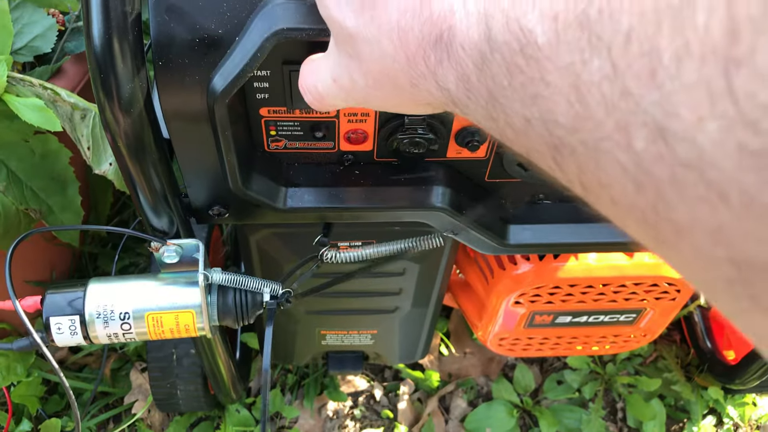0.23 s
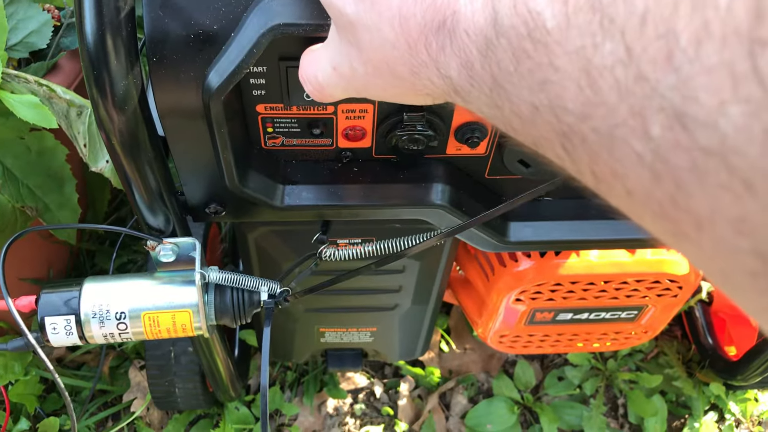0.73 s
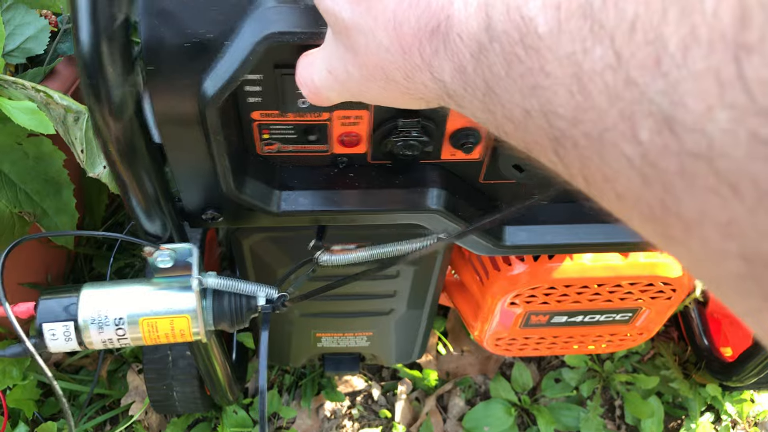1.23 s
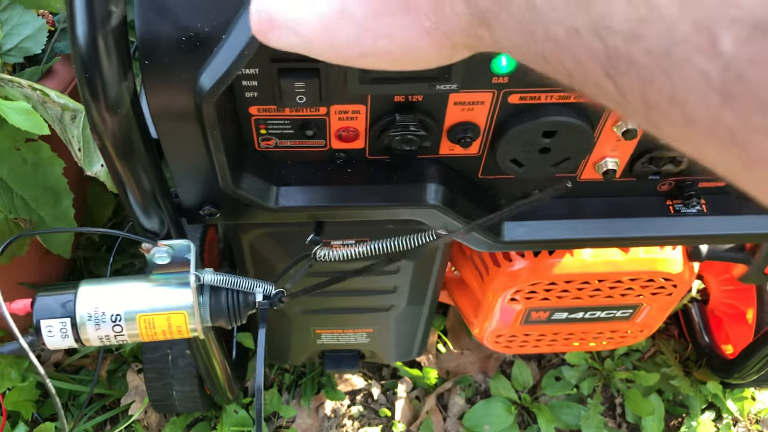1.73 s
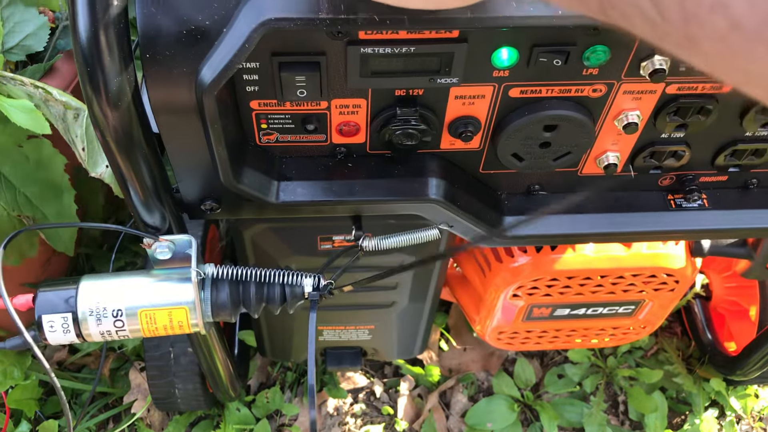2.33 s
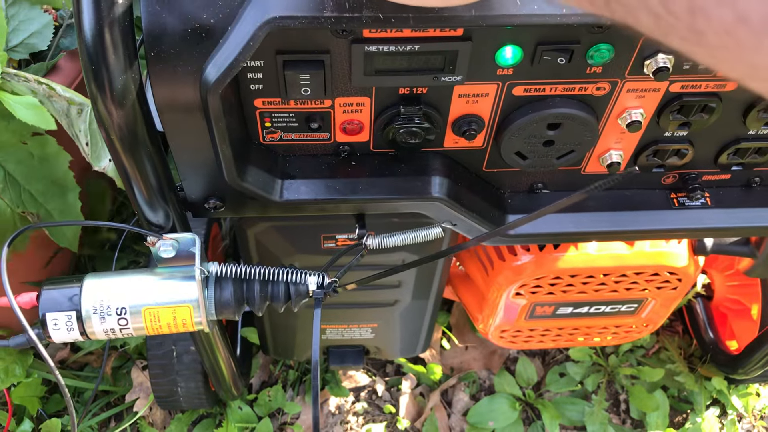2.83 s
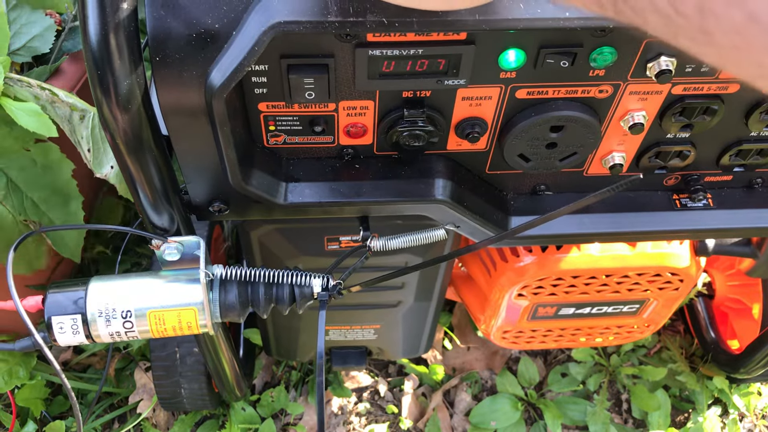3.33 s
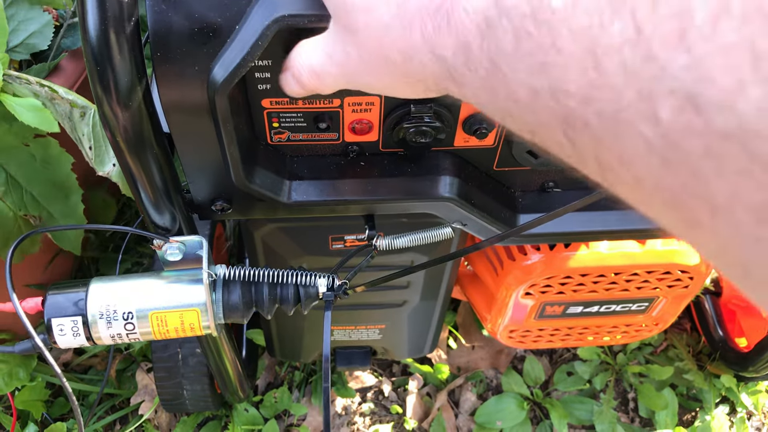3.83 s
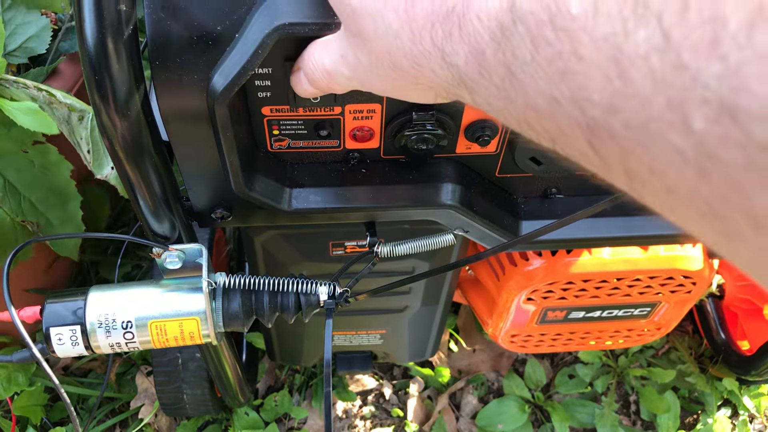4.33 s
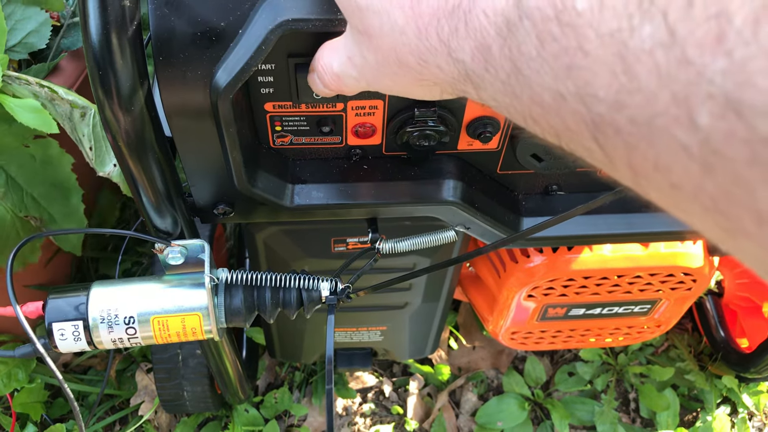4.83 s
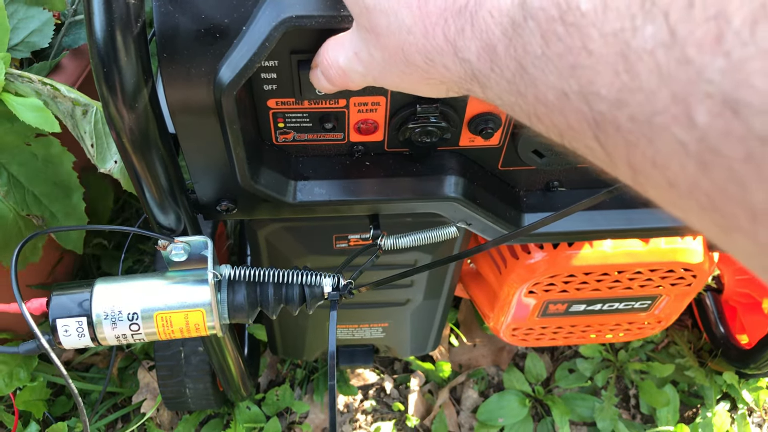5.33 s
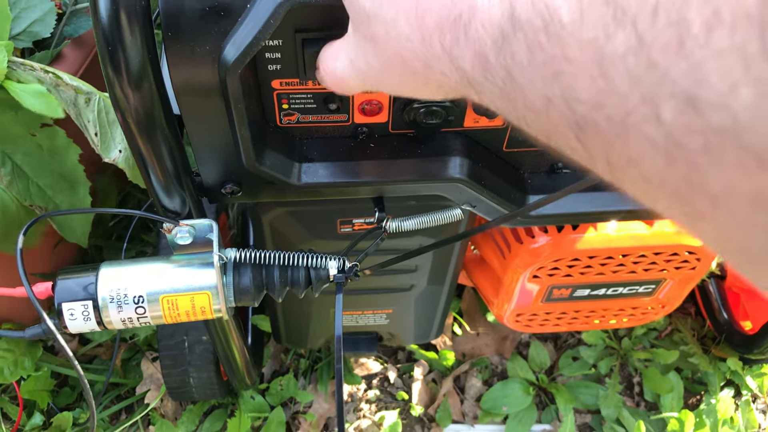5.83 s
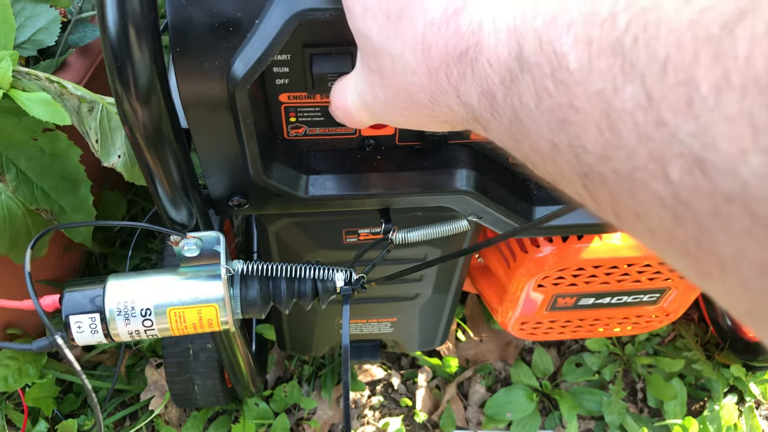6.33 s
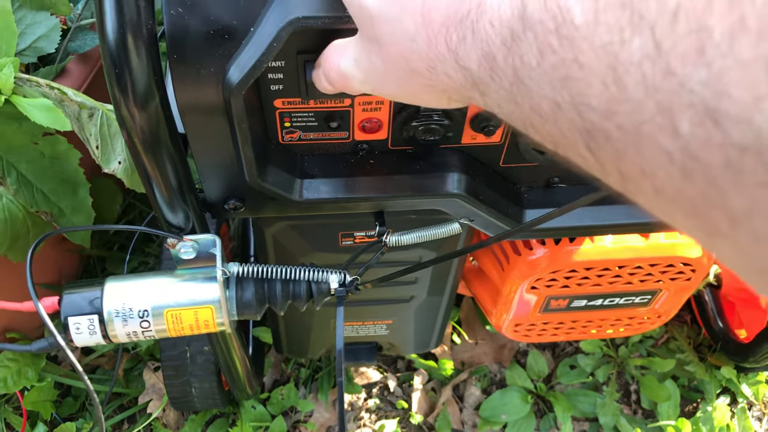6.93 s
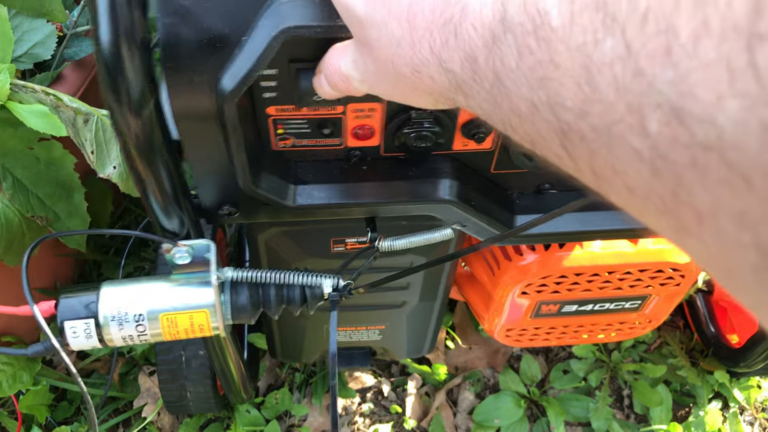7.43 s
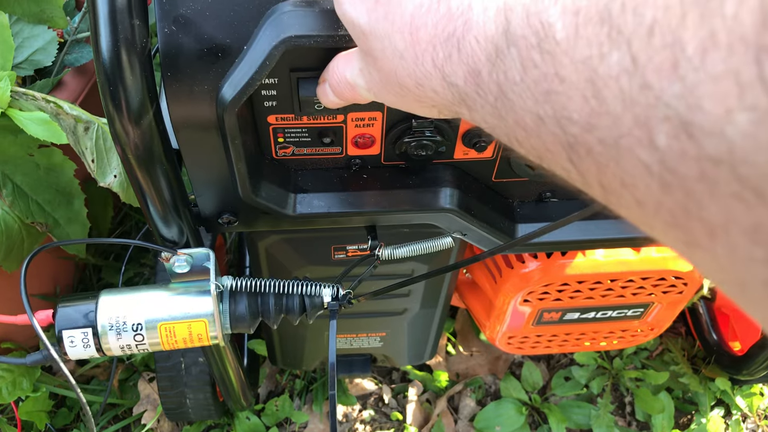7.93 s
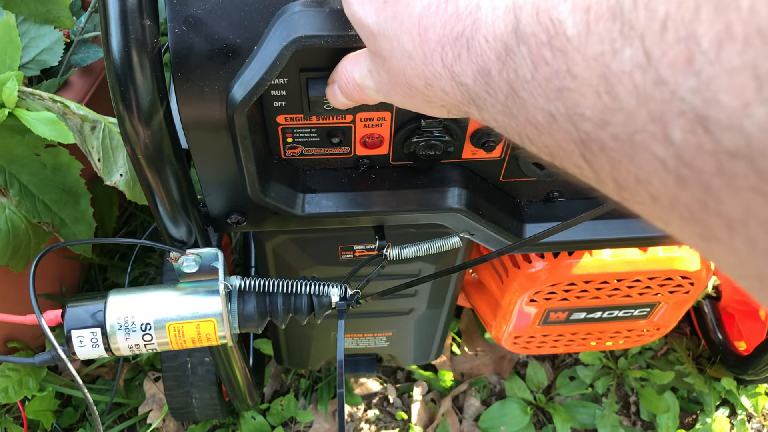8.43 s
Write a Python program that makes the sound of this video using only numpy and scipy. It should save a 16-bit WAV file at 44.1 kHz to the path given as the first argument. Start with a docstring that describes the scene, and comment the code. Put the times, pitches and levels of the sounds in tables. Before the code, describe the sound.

Close metallic clacks and labouring starter whine, a loud popping engine run-up, sudden plunge to a very quiet dull hum, then spin-down into faint outdoor air.

```python
"""A single-cylinder four-stroke generator is started electrically, outdoors, close by.
The starter clacks in and whines by gear meshing; the engine catches with sharp pops, and pressure
pulses timed by the crank angle ring its frame. Just before 2 s the sound drops steeply to a faint,
dull hum of cycle-rate harmonics. With the ignition off, friction and drag slow the crank to rest
under intake drone, hiss and ticks; outdoor air noise lies beneath."""
import sys
import numpy as np
from scipy import signal
from scipy.fft import rfft, irfft
from scipy.io import wavfile

SR = 44100
rng = np.random.default_rng(int(sys.argv[2]) if len(sys.argv) > 2 else 0)


def unload_wav(signal):
    """Save mono or channel-first audio to the path in sys.argv[1] as 16-bit WAV at rate SR, clipped to [-1, 1]."""
    wavfile.write(
        sys.argv[1],
        SR,
        np.round(np.clip(np.atleast_2d(signal).T, -1, 1) * 32767).astype(np.int16),
    )


N = 382788
TIME = np.arange(N) / SR  # s


def gain_of(db):
    """Level definition: decibels to amplitude ratio."""
    return 10 ** (np.asarray(db) / 20)


def evened(x):
    """Power normalization: scales to rms 1."""
    return x / np.sqrt(np.mean(x ** 2) + 1e-20)


def curves(rows):
    """Linear interpolation: each column of a table, joined by straight lines in time."""
    s, *columns = np.transpose(rows)
    return [np.interp(TIME, s, column) for column in columns]


def rise(start_s, length_s):
    """Linear onset: a straight ramp from 0 to 1."""
    return np.clip((TIME - start_s) / length_s, 0, 1)


def fall(start_s, decay_s):
    """Exponential decay: holds at 1, then dies away."""
    return np.exp(-np.maximum(TIME - start_s, 0) / decay_s)


def louder_with(speed, db, db_per_octave):
    """Power law of speed: db at top speed, sinking with every halving of the speed."""
    return gain_of(db + db_per_octave * np.log2(speed / speed.max() + 1e-9))


def wander(hz):
    """Low-pass random process: slow chance of rms 1 with a Gaussian roll-off at hz."""
    spectrum = rfft(rng.standard_normal(N))
    return evened(irfft(spectrum * np.exp(-(np.fft.rfftfreq(N, 1 / SR) / hz) ** 2), N))


def response(tone, modes=(), tilt_db=0, size=8192):
    """Minimum phase: the causal impulse response of a smooth spectrum with resonances on top."""
    hz = np.fft.rfftfreq(size, 1 / SR) + 1
    f, db = np.transpose(tone)
    db = np.interp(np.log(hz), np.log(f), db) + tilt_db * np.log2(hz / f[0])
    for centre, width, lift_db in modes:
        db = db + lift_db / (1 + (2 * (hz - centre) / width) ** 2)
    # folding the cepstrum onto positive time makes the response causal
    cepstrum = irfft(np.log(gain_of(db)))
    cepstrum[1:size // 2] *= 2
    cepstrum[size // 2 + 1:] = 0
    return irfft(np.exp(rfft(cepstrum)))[:size // 2]


def noise(swing_db, tone, modes=()):
    """Modulated broadband excitation: noise swells by swing_db and rings in a body."""
    source = rng.standard_normal(N) * gain_of(swing_db)
    return evened(signal.oaconvolve(source, response(tone, modes))[:N])


def blows(rows, tone, modes, rise_s, push):
    """Impact excitation: one push and a dying spray of tiny impacts ring in a body."""
    out, t = np.zeros(N), np.arange(SR // 5) / SR
    for s, peak_db, tilt_db, decay_s in rows:
        envelope = (1 - np.exp(-t / rise_s)) * np.exp(-t / decay_s)
        spray = rng.standard_normal(len(t)) * envelope
        spray[0] += push * np.linalg.norm(spray)
        ring = signal.fftconvolve(spray, response(tone, modes, tilt_db))
        part = out[round(s * SR):][:len(ring)]
        part += (gain_of(peak_db) * ring / abs(ring).max())[:len(part)]
    return out


def drone(turn, orders, scatter):
    """Fourier synthesis: harmonics of the cycle rate form a pulse, the high ones scattered in phase."""
    total = 0
    for k, db in orders:
        phase = min(k * scatter, np.pi) * rng.standard_normal()
        total = total + gain_of(db) * np.cos(2 * np.pi * round(k) * turn + phase)
    return evened(total)


PINION_TEETH = 9


def whine(hz, jitter, bite_db, overtone=0, runout=0):
    """Gear-mesh modulation: uneven teeth jolt pitch and strength; runout sways phase each shaft turn."""
    uneven = wander(400) + 0.22 * wander(50)
    angle = 2 * np.pi * np.cumsum(hz * (1 + jitter * uneven)) / SR
    angle = angle + runout * np.sin(angle / PINION_TEETH)
    wave = np.sin(angle) + overtone * np.sin(2 * angle) + 0.28 * overtone ** 2 * np.sin(3 * angle)
    return np.sqrt(2) * evened(gain_of(bite_db * wander(97))) * wave


# outdoor air around the start, and in the quiet: spectra [f/Hz, level/dB]
AIR = [(18, -33), (30, -4), (113, -0.5), (328, -10), (364, -15), (698, -9), (2310, -20), (4900, -46),
       (15000, -54.5)]
QUIET = [(18, -33.5), (30, -4.5), (81, 6.5), (205, -2), (247, -1.5), (274, -2), (538, -8), (680, -7),
         (1140, -10), (4310, -20), (15000, -26.5)]
AIR_DB, QUIET_DB = -42.5, -67.5


def start_air():
    """Stationary broadband noise: the stronger outdoor air, before the drop."""
    return gain_of(AIR_DB) * noise(0, AIR)


def quiet_air():
    """Slowly modulated broadband noise: the faint outdoor air."""
    return gain_of(QUIET_DB) * noise(.7 * wander(12), QUIET)


# soft low bumps [t/s, peak level/dB, brightness/(dB per octave), decay/s]
BUMPS = [(1.118, -15, 1, 0.011), (1.255, -13, -2, 0.024), (7.48, -60, -3, .027), (7.615, -61, -5, .015),
         (8.235, -58.5, -4.5, .03), (8.49, -58.5, -8.5, .03), (8.575, -58.5, -3.5, 0.047)]
# low rumble spectrum [f/Hz, level/dB]
RUMBLE_TONE = [(27, -38.5), (46, 0), (80, 9.5), (150, -3), (300, -7.5), (500, -22), (1500, -59)]


def soft_bumps():
    """Soft impact: a slow onset without a push keeps each bump dull."""
    return blows(BUMPS, RUMBLE_TONE, (), rise_s=0.0074, push=0)


# clacks of solenoid, pinion and crank [t/s, peak level/dB, brightness/(dB per octave), decay/s]
CLACKS = [(.123, -29, 4.5, 0.0028), (.1335, -13, 3, 0.0025), (.156, -3, 0.5, 0.0039), (.161, -5, 1, 0.031),
          (.177, -16, -1.5, 0.0053), (.2135, -1, 3, 0.0052), (.261, -15, 2.5, 0.01),
          (.5315, -8.5, 0.5, 0.0064), (.746, -14, 2.5, 0.0058), (1.077, -9.5, 1, 0.0046),
          (1.084, -2.5, -1.5, 0.007), (1.098, -16, 0.5, 0.028)]
# clack spectrum [f/Hz, level/dB]
CLACK_TONE = [(100, -35), (350, -7), (520, -13), (750, 1), (1050, -1.5), (1300, -5.5), (1650, -15),
              (2700, -16.5), (3600, -26.5), (6000, -37), (15000, -51)]
# resonances of frame, tank and covers, and of the struck chassis [f/Hz, width/Hz, lift/dB]
FRAME = [(126, 88, 2), (232, 10, 6), (366.5, 51, 3), (758, 190, 10.5), (941, 35, 5.5), (1137, 28, 8.5),
         (1293, 270, 8), (1990, 100, 7), (2150, 110, 7), (2576, 370, 8.5), (2845, 72, 7), (3760, 53, 10),
         (6290, 760, 8.5)]
CHASSIS = [(247, 8.8, 7.5), (378, 12, 8.1), (431.1, 16, 7.4)]


def metal_clacks():
    """Modal ringing: struck metal excites the resonances of frame and chassis."""
    return blows(CLACKS, CLACK_TONE, FRAME + CHASSIS, rise_s=0.0019, push=0.44)


# released pinion, freewheeling or skimming the ring gear
# [start t/s, length/s, first f/Hz, last f/Hz, level/dB, pitch jitter 0-1]
WHISTLES = [(1.0, .29, 3430, 3606, -46, 0), (1.349, .035, 2936, 3080, -25.5, .06),
            (1.48, .19, 2350, 2650, -27.5, 0.023)]
WHISTLE_SKEW, WHISTLE_ROUNDNESS = 0.51, .6  # exponents of the swell


def pinion_whistles():
    """Frequency glide: each pinion whistle climbs, swelling quickly and fading slowly."""
    out = np.zeros(N)
    for start_s, length_s, first_hz, last_hz, db, jitter in WHISTLES:
        along = rise(start_s, length_s)
        swell = abs(np.sin(np.pi * along ** WHISTLE_SKEW)) ** WHISTLE_ROUNDNESS
        glide_hz = first_hz + (last_hz - first_hz) * along
        out += gain_of(db) * swell * whine(glide_hz, jitter, bite_db=2.5)
    return out


# starter pinion, labouring against compression [t/s, gear mesh f/Hz]
MESH = [(0.14, 1091), (0.186, 1183), (0.198, 1087), (0.294, 1284), (0.422, 1852), (0.688, 2093),
        (0.716, 1944), (0.842, 2213), (0.96, 2063)]
# spectra of the gears and of the brushes [f/Hz, level/dB]
GEAR_TONE = [(150, -28.5), (500, -23.5), (700, -8.5), (1000, -1.5), (1400, -8), (1700, -16), (2300, -12.5),
             (3000, -14.5), (4600, -36.5), (7500, -37), (10000, -42.5), (15000, -55)]
BRUSH_TONE = [(1500, -27.5), (3500, -3.5), (4600, -2.5), (7500, -6), (10000, -8.5), (15000, -20.5)]
# resonances of the starter housing [f/Hz, width/Hz, lift/dB]
HOUSING = [(5370, 400, 5), (6220, 800, 13.5), (8440, 170, 14.5), (9043, 270, 6.5), (11400, 600, 7)]
# powered, released, then the gears spin on loosely until the engine pulls away
STARTER_ON_S, STARTER_RISE_S = .125, 0.042
STARTER_OFF_S, STARTER_FALL_S, GEARS_FREE_S = 0.922, 0.033, 1.37
# levels at top pinion speed, and their rise with speed
WHINE_DB, WHINE_DB_PER_OCTAVE = -18.5, 8
OVERTONE_DB, OVERTONE_DB_PER_OCTAVE = -0.5, -4.5  # richer in overtones when slow
GEARS_DB, GEARS_DB_PER_OCTAVE = -25, 3
BRUSH_DB, BRUSH_DB_PER_OCTAVE = -44.5, 10
LOOSE_GEARS_DB = -28  # does not depend on speed
SURGE_DB = 1.5  # uneven surging of the whine under load
RUNOUT_RAD = 0.47  # pinion out of true: side tones one shaft turn apart
TOP_JITTER = .036  # relative pitch jitter at top pinion speed


def starter(turn):
    """Source and filter: pinion whine peaks at frame resonances; the teeth rattle swells once each cycle."""
    mesh_hz = curves(MESH)[0]
    on = rise(STARTER_ON_S, STARTER_RISE_S)
    power = on * fall(STARTER_OFF_S, STARTER_FALL_S)
    spinning = on * fall(GEARS_FREE_S, STARTER_FALL_S)
    overtone = louder_with(mesh_hz, OVERTONE_DB, OVERTONE_DB_PER_OCTAVE)
    jitter = TOP_JITTER * mesh_hz / mesh_hz.max()  # rougher as the pinion speeds up
    teeth = whine(mesh_hz, jitter, 4, overtone, RUNOUT_RAD)
    strength = louder_with(mesh_hz, WHINE_DB + SURGE_DB * wander(23), WHINE_DB_PER_OCTAVE)
    tones = signal.oaconvolve(power * strength * teeth, response(GEAR_TONE, FRAME))[:N]
    cycle_swell_db = .6 * np.cos(2 * np.pi * (turn - .8))
    rattle = noise(1.6 * wander(250) + cycle_swell_db, GEAR_TONE, FRAME)
    driven_gain = louder_with(mesh_hz, GEARS_DB, GEARS_DB_PER_OCTAVE) * power
    rattle_gain = np.hypot(driven_gain, gain_of(LOOSE_GEARS_DB) * spinning)
    brushes = power * noise(2 * wander(60), BRUSH_TONE, HOUSING)
    brush_gain = louder_with(mesh_hz, BRUSH_DB, BRUSH_DB_PER_OCTAVE)
    return tones + rattle_gain * rattle + brush_gain * brushes


# engine speed from the first turn until it holds [t/s, four-stroke cycle rate f/Hz]
SPEED = [(.13, 0), (.3, 6.702), (.7, 4.054), (1.33, 8.134), (1.55, 23.881), (2.05, 26.599), (2.17, 30.859)]
# friction in cycles a second lost each second; time constant of air drag in s
IGNITION_OFF_S, FRICTION_PER_S, DRAG_S = 5.926, 11.25, 4.571


def crank_speed():
    """Constant plus viscous damping: cycles a second in run-up, steady speed, then coasting to rest."""
    friction = FRICTION_PER_S * DRAG_S
    return np.maximum((curves(SPEED)[0] + friction) * fall(IGNITION_OFF_S, DRAG_S) - friction, 0)


# hum at steady speed, and intake drone with open throttle [multiple of the cycle rate, level/dB]
HUM = [(2, -65), (3, -77.5), (4, -71.5), (5, -66.5), (6, -77), (8, -70), (10, -81.5), (12, -79.5),
       (13, -83), (14, -78), (15, -75.5), (18, -79.5), (19, -85.5), (22, -79.5), (23, -79.5), (25, -72),
       (26, -90), (27, -79.5), (29, -95), (30, -74.5), (31, -88)]
INTAKE = [(2, -8), (3, -0.5), (4, -4), (5, -14.5), (6, -6), (7, -1.5), (8, -10), (9, -12.5), (10, -5),
          (11, -11), (12, -15.5), (13, -12.5), (14, -13.5), (16, -12), (18, -14), (22, -15)]
# spectra of the hiss, of the valve ticks and of the ringing case [f/Hz, level/dB]
HISS_TONE = [(25, -23.5), (55, 7.5), (100, 2), (330, -1), (600, -2), (760, 4.5), (930, -1.5), (1050, -15.5),
             (2400, -15.5), (2800, -18.5), (4100, -13.5), (4800, -21.5), (9000, -16), (10400, -29.5),
             (15000, -24.5)]
TICK_TONE = [(1500, -31), (3000, -7), (3330, 2), (3700, -13.5), (9000, -20.5), (15000, -28)]
CASE_TONE = [(300, -33), (700, -4.5), (950, -0.5), (1150, -25.5), (4000, -45)]
# resonances of the engine shroud and of the case [f/Hz, width/Hz, lift/dB]
SHROUD = [(2460, 120, 4), (3870, 83, 5), (4120, 110, 6.2), (4400, 110, 7), (5330, 280, 6.1),
          (6350, 260, 5.8), (8300, 360, 3), (9580, 270, 7.5)]
CASE = [(765, 45, 8.3), (890, 58, 7)]
FAINT_S, FAINT_RISE_S = 1.93, 0.25
# the throttle closes once up to speed and opens as the engine dies
THROTTLE_CLOSES_S, THROTTLE_CLOSE_S, THROTTLE_OPENS_S, THROTTLE_OPEN_S = 2.16, 0.08, 5.896, 0.18
HUM_DB, HUM_FROM_S, HUM_RISE_S, HUM_FALL_S = -59.5, 1.98, 0.23, .12
BUZZ_DB = -16  # relative to the hum
# levels at top speed and their rise with speed; the throttle terms add when it is open
HISS_DB, HISS_DB_PER_OCTAVE, HISS_THROTTLE_DB = -64, 9, 1.3
THROB_DB, THROB_THROTTLE_DB = 1.56, 2.5  # swing within each cycle
INTAKE_DB, INTAKE_DB_PER_OCTAVE = -55, 7
CASE_DB, CASE_DB_PER_OCTAVE = -71, 3.5
TICK_DB, TICK_DB_PER_OCTAVE, TICKS_END_S, TICKS_FADE_S = -85.5, 1.5, 7.12, .1
ALTERNATOR_ORDER, ALTERNATOR_DB = 68.4, -82  # multiple of the cycle rate; level


def faint_engine(turn, speed):
    """Order-locked radiation: hum while firing; intake, hiss, case and ticks sink as the crank slows."""
    heard = rise(FAINT_S, FAINT_RISE_S)
    closing = fall(THROTTLE_CLOSES_S, THROTTLE_CLOSE_S) * heard ** 2
    throttle = closing + rise(THROTTLE_OPENS_S, THROTTLE_OPEN_S)
    shaft = turn + 0.0014 * wander(25)
    hum = drone(shaft - .69, HUM, scatter=0.1)
    # gears and cam repeat every cycle
    buzz_orders = [(k, 4 * rng.standard_normal()) for k in range(33, 83)]
    buzz = drone(shaft, buzz_orders, scatter=.1)
    alternator = gain_of(ALTERNATOR_DB) * whine(ALTERNATOR_ORDER * speed, .002, bite_db=3)
    firing = rise(HUM_FROM_S, HUM_RISE_S) * fall(IGNITION_OFF_S, HUM_FALL_S)
    running = firing * (gain_of(HUM_DB) * (hum + gain_of(BUZZ_DB) * buzz) + alternator)

    throb_db = (THROB_DB + THROB_THROTTLE_DB * throttle) * np.cos(2 * np.pi * (turn - .94))
    hiss = noise(throb_db + 1.0 * wander(150), HISS_TONE, SHROUD)
    hiss_gain = louder_with(speed, HISS_DB + HISS_THROTTLE_DB * throttle, HISS_DB_PER_OCTAVE)
    case = noise(throb_db, CASE_TONE, CASE)
    case_gain = louder_with(speed, CASE_DB, CASE_DB_PER_OCTAVE)
    intake = -drone(shaft, INTAKE, scatter=.13) * gain_of(1.2 * wander(30))
    intake_gain = louder_with(speed, INTAKE_DB, INTAKE_DB_PER_OCTAVE)
    # a deep swing leaves one short tick per cycle
    ticks = noise(26 * np.cos(2 * np.pi * (turn - .99)), TICK_TONE, [(3330, 160, 12)])
    tick_gain = fall(TICKS_END_S, TICKS_FADE_S) * louder_with(speed, TICK_DB, TICK_DB_PER_OCTAVE)
    return (running + heard * (hiss_gain * hiss + case_gain * case)
            + throttle * (intake_gain * intake + tick_gain * ticks))


# first firings, some cycles skipped [t/s, peak level/dB, brightness/(dB per octave), decay/s]
POPS = [(1.256, -20.5, -1, 0.057), (1.351, -9, -1.5, 0.039), (1.424, -9.5, 1, 0.016), (1.48, -7, -1, 0.014),
        (1.528, -10.5, 0.5, 0.014), (1.572, -8, -1.5, 0.01), (1.613, -12, .5, 0.014),
        (1.695, -14, 1.5, 0.018), (1.775, -5.5, -1, 0.012), (1.854, -7, -.5, 0.015),
        (1.93, -21.5, 2.5, 0.0015), (2.005, -54, 9, 0.017), (2.082, -54.5, 12, 0.015),
        (2.117, -55, 12, 0.025), (2.151, -51, 12, 0.025)]
# pop spectrum [f/Hz, level/dB]
POP_TONE = [(60, -4.5), (300, 0.5), (520, -4), (800, 0.5), (1300, -6), (1700, -7.5), (2700, -6.5),
            (3600, -14.5), (5000, -19), (9000, -22.5), (15000, -36)]


def firing_pops():
    """Impulsive combustion: each firing bursts into the resonances of the frame."""
    return blows(POPS, POP_TONE, FRAME, rise_s=0.0029, push=0.054)


# exhaust, valve overlap, intake and compression pulses [place/cycles, push]
STROKES = [(0.659, 0.93), (.89, 0.059), (0.971, -1.1), (1.25, -.25)]


def strokes(turn, tone, modes, uneven_db):
    """Periodic impulse excitation: pressure pulses of each cycle, each a little different in strength."""
    kicks = np.zeros(N)
    for place, push in STROKES:
        # one kick whenever the crank passes this place
        kicks += push * np.diff(np.floor(turn - place), prepend=np.floor(-place))
    kicks *= gain_of(uneven_db * rng.standard_normal(N))
    ring = response(tone, modes)
    return signal.oaconvolve(kicks, ring / abs(ring).max())[:N]


# spectra of the pressure pulses and of the clatter [f/Hz, level/dB]
STROKE_TONE = [(27, -33), (43, 7.5), (90, 1), (150, -1), (280, -7), (500, -25), (1000, -44.5),
               (3000, -69.5)]
CLATTER_TONE = [(200, -5.5), (400, 0), (520, -4), (720, 0.5), (1000, -5), (1400, -7), (1700, -10.5),
                (2500, -11), (3500, -27.5), (7000, -39), (15000, -50)]
# exhaust and frame growl under full throttle [multiple of the cycle rate, level/dB]
GROWL = [(2, -5.5), (3, -12), (4, -14), (5, -2.5), (6, -2), (7, -13), (8, -13.5), (9, -2.5), (10, -8),
         (12, -7.5), (13, -11), (15, -16), (16, -16.5)]
# the cylinder pumps harder as cranking gets going, then the engine catches
PUMP_S, PUMP_RISE_S, CATCH_S, CATCH_RISE_S = 0.1, 0.27, 1.2, .17
STROKE_CRANKING_DB, STROKE_FIRING_DB = -24.5, -10.5
RUMBLE_CRANKING_DB, RUMBLE_FIRING_DB = -36.5, -22
ROCKING_DB = 4  # swing of the cranking rumble as the frame rocks
# levels at top speed, and their rise with speed
CLATTER_DB, CLATTER_DB_PER_OCTAVE = -15.5, 7.5
GROWL_DB, GROWL_DB_PER_OCTAVE = -17.5, 5


def run_up(turn, speed):
    """Forced vibration: pumping, then firing, drives the frame; valve gear and piston clatter twice a cycle."""
    pumping, firing = rise(PUMP_S, PUMP_RISE_S), rise(CATCH_S, CATCH_RISE_S)
    pulses = strokes(turn, STROKE_TONE, FRAME, uneven_db=3.0)
    pulse_gain = np.hypot(gain_of(STROKE_CRANKING_DB) * pumping ** 2, gain_of(STROKE_FIRING_DB) * firing)
    rocking = noise(ROCKING_DB * np.cos(6 * np.pi * (turn - .06)), RUMBLE_TONE, FRAME)
    rocking_gain = gain_of(RUMBLE_CRANKING_DB) * rise(STARTER_ON_S, STARTER_RISE_S)
    rumble = noise(4 * np.cos(2 * np.pi * (turn - .85)), RUMBLE_TONE, FRAME)
    growl = -drone(turn, GROWL, scatter=0.19)  # peaks on the intake stroke
    growl_gain = louder_with(speed, GROWL_DB, GROWL_DB_PER_OCTAVE)
    clatter = noise(2.6 * np.cos(4 * np.pi * (turn - .9)) + 2 * wander(200), CLATTER_TONE, FRAME)
    clatter_gain = louder_with(speed, CLATTER_DB, CLATTER_DB_PER_OCTAVE)
    return (pulse_gain * pulses + rocking_gain * rocking
            + firing * (gain_of(RUMBLE_FIRING_DB) * rumble + growl_gain * growl)
            + clatter_gain * clatter)


# the sudden fall in loudness [t/s, level/dB]
DROP = [(1.936, -1), (1.95, -40), (1.975, -62), (2.02, -75)]


def scene():
    """Superposition: the engine layers follow the crank speed and its angle counted in cycles."""
    speed = crank_speed()
    turn = np.cumsum(speed) / SR
    loud = start_air() + pinion_whistles() + starter(turn) + run_up(turn, speed)
    impacts = soft_bumps() + metal_clacks() + firing_pops()
    mix = loud * gain_of(curves(DROP)[0]) + impacts + faint_engine(turn, speed) + quiet_air()
    return mix[None]


EDGE_HZ = 15800  # upper band limit


def record(dry):
    """Band limiting and saturation: a small microphone loses deep bass and rounds the loudest peaks."""
    lean = signal.sosfilt(signal.butter(4, 33, "highpass", fs=SR, output="sos"), dry)
    rounded = lean / (1 + (lean / .95) ** 6) ** (1 / 6)
    lowpass = signal.firwin(511, EDGE_HZ, window=("kaiser", 9), fs=SR)
    return signal.oaconvolve(rounded, lowpass[None], "same")


dry = scene()
out = record(dry)
unload_wav(out)
```